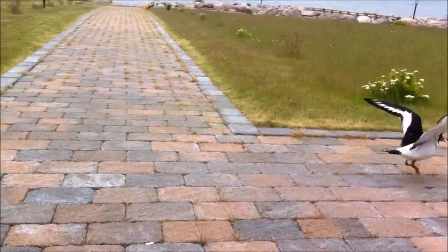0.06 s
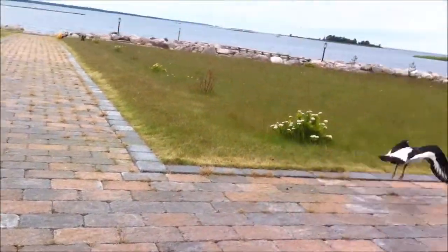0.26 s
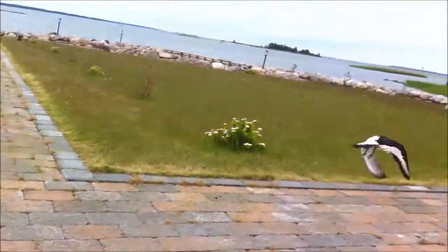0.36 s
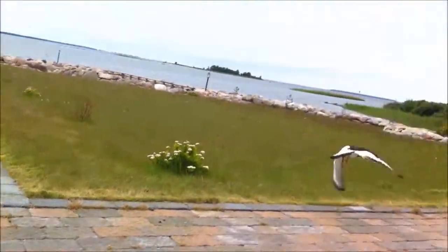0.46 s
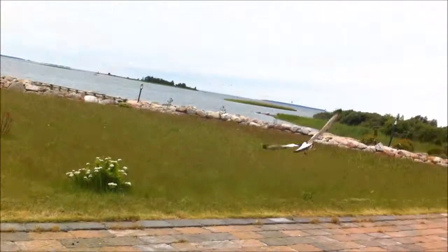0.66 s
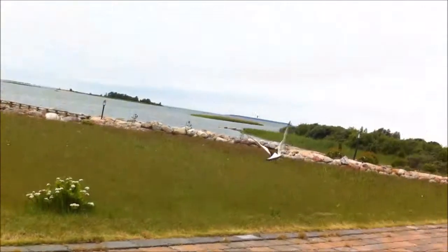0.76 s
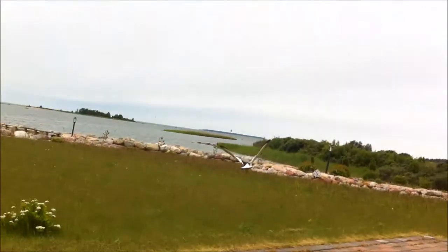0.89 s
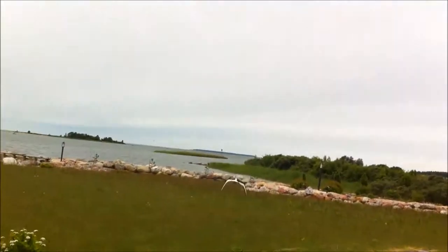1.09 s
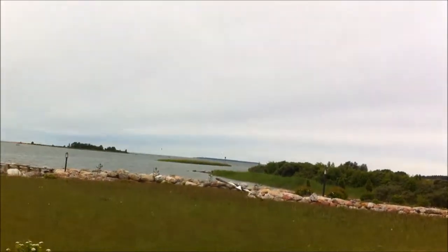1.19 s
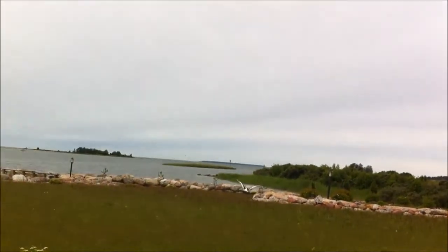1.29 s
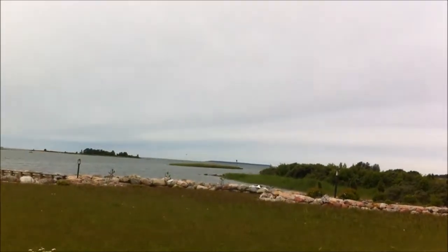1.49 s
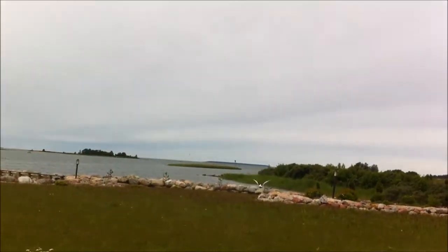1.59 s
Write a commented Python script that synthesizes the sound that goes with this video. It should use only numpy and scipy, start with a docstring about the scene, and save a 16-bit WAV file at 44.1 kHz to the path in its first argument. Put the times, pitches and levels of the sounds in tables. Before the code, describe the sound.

One piercing shorebird whistle breaks into a rasp over low puffs of wind.

```python
"""Oystercatcher on a breezy shore

Close to the microphone an oystercatcher takes off with one piercing two-step whistle that breaks
into a rasp, thrown back by paving and a wall. Light wind buffets the microphone in low puffs.
A few small ticks and soft rustles pass nearby; far off lie a faint shore wash and other waders."""
import sys
import numpy as np
from scipy import signal
from scipy.fft import rfft, irfft
from scipy.io import wavfile
from scipy.ndimage import uniform_filter1d

SR = 44100
rng = np.random.default_rng(int(sys.argv[2]) if len(sys.argv) > 2 else 0)


def digitize_waveform(pressure):
    """Quantize a signal to 16-bit integers and store it at the path in sys.argv[1].

    Rows of a 2-D input are taken as channels; values are limited to [-1, 1].
    """
    field = np.atleast_2d(pressure).T
    bounded = np.clip(field, -1, 1)
    quanta = np.round(bounded * 32767).astype(np.int16)
    wavfile.write(sys.argv[1], SR, quanta)


N = 72765

# colour of the distant wash: frequency_hz, density_db
WASH_SPECTRUM = [(30, 4.5), (200, 0.5), (500, -3.5), (900, -6.5), (1300, -7.5), (1800, 0), (2600, -8.5),
                 (4000, -12.5), (7000, -12), (10000, -10.5), (16000, -14)]
# rise and fall of the wash's treble: time_s, gain_db
WASH_TREBLE = [(0, 4.5), (.3, -6), (.8, 1), (1.2, -7.5), (1.35, -3), (1.65, -6.5)]
# far waders: start_s, length_s, start_hz, end_hz, level_db
FAR_WHISTLES = [(-.04, 0.16, 3160, 3120, -69.5), (.1, 0.14, 3165, 3153, -64.5),
                (1.29, 0.12, 2610, 2304, -64.5), (1.415, 0.029, 3170, 3130, -71),
                (1.431, 0.023, 2720, 2740, -62.5), (1.455, 0.023, 2780, 2540, -60.5)]
# soft rustles nearby: centre_s, length_s, level_db
RUSTLES = [(.2, 0.1, -64.5), (.34, 0.18, -61.5), (.92, 0.23, -58), (1.15, 0.14, -61.5)]
# colour of a rustle: frequency_hz, density_db
RUSTLE_SPECTRUM = [(100, 2), (1000, 12), (2500, 4.5), (5000, 4.5), (7000, 5), (9500, 7), (13000, 6),
                   (16000, -21)]
# small ticks: start_s, level_db, low_cut_hz
TICKS = [(0.0134, -46, 7860), (0.2059, -46.5, 7550), (0.9938, -35.5, 400), (1.0609, -40, 6640),
         (1.151, -47.5, 4660), (1.195, -38.5, 633)]
# colour of a tick: frequency_hz, density_db
TICK_SPECTRUM = [(300, 17), (1000, 5), (1800, 10.5), (2500, -1), (3700, -3), (7000, -1), (9500, 1.5),
                 (11300, 2.5), (13000, -2.5), (16000, -2.5)]
# colour of wind on the microphone: frequency_hz, density_db
WIND_SPECTRUM = [(25, -15.5), (50, -23), (80, -10.5), (120, 1), (165, 2.5), (240, -5), (330, -16.5),
                 (480, -22.5), (750, -49.5), (1500, -110), (5000, -91)]
# gusts on the microphone: centre_s, length_s, level_db
GUSTS = [(.025, 0.083, -41.5), (.105, 0.017, -46), (.17, 0.057, -47.5), (.218, 0.04, -34.5),
         (.263, 0.059, -36.5), (.385, 0.029, -45.5), (.445, 0.017, -39.5), (.51, 0.048, -44.5),
         (.675, 0.16, -54.5), (.728, 0.058, -54.5), (.85, 0.08, -50), (.922, 0.047, -40.5),
         (.996, 0.042, -36.5), (1.081, 0.026, -38), (1.15, 0.069, -54), (1.273, 0.011, -48),
         (1.355, 0.064, -39), (1.635, 0.043, -38.5)]
# sharp buffets on the microphone: start_s, peak_db
BUFFETS = [(.2045, -23), (.2235, -29), (.2705, -24), (.575, -37), (.911, -31), (.926, -30), (.9755, -31),
           (.9945, -31), (1.344, -27), (1.3745, -29), (1.5898, -28), (1.6375, -30)]
# echoes off paving and wall: delay_s, gain_db
ECHOES = [(.0075, -12.5), (.023, -12), (.031, -10), (.038, -15)]
# diffuse tail of the surroundings: frequency_hz, level_db, t60_s
TAIL_BANDS = [(700, 22.5, .6), (1500, 6.5, 1), (2110, -8, 0.48), (2750, -2.5, .4), (3200, 2, 0.34),
              (3800, -5, 0.38), (4600, -5.5, 0.4), (6700, -8, 0.46), (9500, -7, 0.24), (15000, -11, 0.4)]
# how much of the call feeds the tail: time_s, gain_db
TAIL_SEND = [(.46, 0), (.48, -3), (.5, -2), (.512, 3), (.53, .5)]
# lingering echo of the call's low opening note: time_s, pitch_hz, level_db
LINGERING_ECHO = [(.428, 2219, -42), (0.437, 2216, -31), (.449, 2190, -38), (.475, 2190, -44),
                  (.5, 2198, -40), (0.509, 2270, -52)]
# fundamental of the close call: time_s, pitch_hz, level_db
CALL_CONTOUR = [(.374, 1487, -61), (.384, 1732, -47.5), (.39, 1962, -46.5), (.4, 2175, -37),
                (0.406, 2212, -35), (.426, 2120, -36), (.435, 1954, -43.5), (0.446, 1836, -47),
                (0.451, 2131, -38), (0.458, 2398, -35), (.461, 2859, -27.5), (.47, 3115, -30.5),
                (0.478, 3199, -20.5), (0.492, 3235, -28.5), (0.504, 3315, -30.5), (0.508, 3787, -27),
                (0.516, 3759, -29), (.522, 3614, -34), (.525, 3101, -30.5), (0.536, 2827, -31.5),
                (0.542, 2286, -32.5), (0.547, 1760, -43)]
# the overtones together, and how rough the voice is: time_s, level_db, roughness
CALL_EDGE = [(0.384, -66, 0.8), (0.387, -46.5, 0.64), (0.409, -40, 0.17), (0.426, -40, 0.77),
             (.445, -50, 0.3), (0.454, -38.5, 0.6), (0.464, -35.5, 0.8), (.478, -32.5, .15),
             (0.493, -29.5, 0.1), (0.504, -23.5, 0.1), (0.514, -39.5, 1), (.524, -26.5, 1),
             (.532, -28, 1.1), (0.539, -38.5, 1), (.547, -42, 0.9)]
# strength of each overtone: pitch_multiple, gain_db
OVERTONES = [(2, -2), (3, -9.5), (4, -8), (5, -15), (6, -12)]
# throat and bill colour on the overtones: frequency_hz, gain_db
BILL_COLOUR = [(3500, -3), (4400, -2), (5400, -3.5), (6500, -11.5), (7400, 0.5), (8100, 0.5), (8800, -3.5),
               (9700, 5), (10400, -3), (11200, 2), (11900, -1), (12900, 0.5), (13900, -14), (15300, -2),
               (16300, -26)]
# overtones fraying into noise as the call breaks: time_s, noise_share
FRAYING = [(.445, .04), (.46, .1), (.48, .1), (.503, .1), (.515, .25), (.54, .3)]
# hoarse air in the call: frequency_hz, density_db
RASP_SPECTRUM = [(200, -9.5), (800, -23), (1400, -5), (2200, 16), (3200, 11.5), (4800, 8.5), (7000, 18.5),
                 (9500, 5), (13000, 10), (16000, -2)]
# dips in the call's colour: centre_hz, width_hz, gain_db
CALL_DIPS = [(4120, 190, -8), (5270, 200, -7), (8150, 400, -15), (10380, 390, -17)]

JITTER_SHARE, JITTER_HZ = 0.012, 900  # pitch flutter of the call and its lingering echo
SHIMMER_DB, SHIMMER_HZ = 3.5, 208  # their level flutter


def amp(db):
    """Decibels to gain."""
    return 10 ** (np.asarray(db) / 20)


def unit(x):
    """Scales to rms 1."""
    return x / np.sqrt(np.mean(x ** 2) + 1e-20)


def read(points, hz):
    """Reads a spectrum on a log-frequency axis."""
    f, value = np.transpose(points)
    return np.interp(np.log(hz + 1), np.log(f + 1), value)


def add(mix, start_s, sound):
    """Mixes a sound in at its start time and returns the mix."""
    at = round(start_s * SR)
    sound = sound[max(-at, 0):]
    part = mix[max(at, 0):][:len(sound)]
    part += sound[:len(part)]
    return mix


def noise(spectrum):
    """Noise of rms 1 with the given spectrum."""
    gain = amp(read(spectrum, np.fft.rfftfreq(N, 1 / SR)))
    return unit(irfft(rfft(rng.standard_normal(N)) * gain, N))


def wander(hz, samples=N):
    """Random drift of rms about 1, up to the given rate."""
    gain = np.exp(-(np.fft.rfftfreq(N, 1 / SR) / hz) ** 2)
    return unit(irfft(rfft(rng.standard_normal(N)) * gain, N))[:samples]


def swells(rows):
    """Power of bell-shaped swells."""
    t = np.arange(N) / SR
    return sum(amp(db) ** 2 * np.exp(-(2 * (t - centre) / length) ** 2) for centre, length, db in rows)


def phase_of(hz):
    """Running phase of a moving pitch, in radians."""
    return 2 * np.pi * np.cumsum(hz) / SR


def fade_ends(t, times, ramp_s=0.002):
    """Short ramps at both ends of a note."""
    return np.clip(np.minimum(t - times[0], times[-1] - t) / ramp_s, 0, 1)


def shore_wash(level_db=-60, patch_db=1.2, treble_hz=3420):
    """The shore in the distance: a faint wash with drifting patches of colour."""
    hz, t, bands = signal.stft(noise(WASH_SPECTRUM), SR, nperseg=512)
    blur = np.outer(np.hanning(9), np.hanning(15))
    patches = unit(signal.fftconvolve(rng.standard_normal(bands.shape), blur, "same"))
    treble_db = np.outer(hz ** 4 / (hz ** 4 + treble_hz ** 4), np.interp(t, *np.transpose(WASH_TREBLE)))
    wash = unit(signal.istft(bands * amp(patch_db * patches + treble_db), nperseg=512)[1][:N])
    opening_db = np.interp(np.arange(N) / SR, [0, 0.35], [-5.5, 0])
    return amp(level_db + opening_db) * wash


def diffuse_tail(sound, delay_s=0.006, rise_s=0.021):
    """Scatter from the surroundings, the treble dying first."""
    band_hz, band_db, band_t60 = np.transpose(TAIL_BANDS)
    hz, t, bands = signal.stft(rng.standard_normal(SR), SR, nperseg=256)
    gain = amp(read(np.c_[band_hz, band_db], hz))[:, None]
    decay_rate = np.log(1000) / read(np.c_[band_hz, band_t60], hz)[:, None]
    decay = np.exp(-decay_rate * t) * np.sqrt(2 * decay_rate / SR)  # same energy at any t60
    ring = signal.istft(bands * gain * decay, SR, nperseg=256)[1]
    age = np.maximum(np.arange(len(ring)) / SR - delay_s, 0)
    near_scatter = 1 + 0.63 * np.exp(-age / 0.0081)
    ring *= np.minimum(age / rise_s, 1) * near_scatter
    return signal.fftconvolve(sound, ring)[:N]


def far_waders(waver_hz=260, tail_db=-12):
    """Thin level or falling whistles, blurred by distance."""
    out = np.zeros(N)
    for start, length, start_hz, end_hz, db in FAR_WHISTLES:
        progress = np.arange(0, length, 1 / SR) / length
        glide_hz = start_hz + (end_hz - start_hz) * progress
        waver = 0.004 + 0.4 * abs(end_hz / start_hz - 1)  # gliding whistles waver more
        hz = glide_hz * (1 + waver * wander(waver_hz, len(progress)))
        arch = np.sqrt(abs(np.sin(np.pi * progress)))
        add(out, start, amp(db) * arch * np.sin(phase_of(hz)))
    return out + amp(tail_db) * diffuse_tail(out)


def rustles():
    """Soft swells of hiss nearby."""
    return noise(RUSTLE_SPECTRUM) * np.sqrt(swells(RUSTLES))


def ticks(rise_s=0.00031, decay_s=0.0018):
    """Tiny dry snaps with no ring."""
    out, t = np.zeros(N), np.arange(SR // 50) / SR
    envelope = np.minimum(t / rise_s, 1) * np.exp(-t / decay_s)
    for start, db, low_cut_hz in TICKS:
        low_cut = signal.butter(2, low_cut_hz, "high", fs=SR, output="sos")
        snap = unit(signal.sosfilt(low_cut, noise(TICK_SPECTRUM)))[:len(t)]
        add(out, start, amp(db) * snap * envelope)
    return out


def wind_rumble(breeze_db=-66, lump_db=3.5, lump_hz=25):
    """Wind on the microphone: a lumpy rumble that swells with each gust."""
    rumble = noise(WIND_SPECTRUM)
    breeze = amp(breeze_db + lump_db * wander(lump_hz))
    return rumble * np.sqrt(swells(GUSTS) + breeze ** 2)


def wind_buffets(start_hz=330, end_hz=156, sag_s=0.0032, rise_s=0.0014, decay_s=0.0042):
    """Puffs hit the microphone as short thumps that sag in pitch."""
    out, t = np.zeros(N), np.arange(SR // 20) / SR
    hz = end_hz + (start_hz - end_hz) * np.exp(-t / sag_s)
    envelope = (1 - np.exp(-(t / rise_s) ** 2)) * np.exp(-t / decay_s)
    thump = envelope * np.sin(phase_of(hz))
    for start, db in BUFFETS:
        add(out, start, amp(db) * thump / abs(thump).max())
    return out


def echoes(sound, top_hz=4500):
    """Single reflections from paving and wall, dulled by the grass."""
    out = np.zeros(N)
    for delay, db in ECHOES:
        add(out, delay, amp(db) * sound)
    return signal.sosfilt(signal.butter(1, top_hz, fs=SR, output="sos"), out)


def lingering_echo():
    """The call's low opening note rings on near 2.2 kHz as a lingering echo."""
    times, pitch, db = np.transpose(LINGERING_ECHO)
    t = np.arange(times[0], times[-1], 1 / SR)
    hz = np.interp(t, times, pitch) * (1 + JITTER_SHARE * wander(JITTER_HZ, len(t)))
    level = amp(np.interp(t, times, db) + SHIMMER_DB * wander(SHIMMER_HZ, len(t)))
    tone = np.sqrt(2) * level * np.sin(phase_of(hz))
    return add(np.zeros(N), times[0], tone * fade_ends(t, times))


def hollowed(voice):
    """Narrow dips part the call's bright bands."""
    hz = np.fft.rfftfreq(N, 1 / SR)
    dips_db = sum(db * np.exp(-(2 * (hz - centre) / width) ** 2) for centre, width, db in CALL_DIPS)
    return irfft(rfft(voice) * amp(dips_db), N)


def oystercatcher_call(flicker_db=3.5, flicker_hz=132, fray_hz=650, rasp_db=-9):
    """Close by, a whistle steps up in pitch, purest when loudest, and breaks into a rasp as it falls."""
    times, pitch, db = np.transpose(CALL_CONTOUR)
    t = np.arange(times[0], times[-1], 1 / SR)
    n = len(t)
    edge_times, edge_levels, edge_roughness = np.transpose(CALL_EDGE)
    edge_db = np.interp(t, edge_times, edge_levels)
    roughness = np.clip(np.interp(t, edge_times, edge_roughness), 0, 1)
    glide_hz = uniform_filter1d(np.interp(t, times, pitch), size=90)
    hz = glide_hz * (1 + JITTER_SHARE * roughness * wander(JITTER_HZ, n))
    phase = phase_of(hz)
    shimmer_db = SHIMMER_DB * roughness * wander(SHIMMER_HZ, n)
    voice = amp(np.interp(t, times, db) + shimmer_db) * np.sin(phase)
    noise_share = np.interp(t, *np.transpose(FRAYING))
    for multiple, gain_db in OVERTONES:
        level_db = edge_db + gain_db + read(BILL_COLOUR, multiple * hz)
        level_db += flicker_db * wander(flicker_hz, n)  # each overtone fades on its own
        fuzz = (wander(fray_hz, n) + 1j * wander(fray_hz, n)) / np.sqrt(2)
        fraying = np.sqrt(1 - noise_share) + np.sqrt(noise_share) * fuzz
        overtone = (fraying * np.exp(1j * multiple * phase)).imag
        voice += amp(level_db) * (multiple * hz < SR / 2) * overtone
    voice += amp(edge_db + rasp_db) * roughness * noise(RASP_SPECTRUM)[:n]
    return add(np.zeros(N), times[0], np.sqrt(2) * voice * fade_ends(t, times))


def scene():
    """At one microphone: the close bird and its echoes over wind and shore."""
    bird = hollowed(oystercatcher_call() + lingering_echo())
    send = amp(np.interp(np.arange(N) / SR, *np.transpose(TAIL_SEND)))  # the call's end rings on most
    reflections = echoes(bird) + diffuse_tail(bird * send)
    wind = wind_rumble() + wind_buffets()
    background = shore_wash() + rustles() + ticks() + far_waders()
    return (background + wind + reflections + bird)[None]


def record(dry, low_cut_hz=65, top_hz=16200):
    """The microphone's low cut and the recorder's band limit."""
    thinned = signal.sosfilt(signal.butter(2, low_cut_hz, "high", fs=SR, output="sos"), dry)
    band_limit = signal.firwin(511, top_hz, window=("kaiser", 9), fs=SR)
    return signal.oaconvolve(thinned, band_limit[None], "same")


dry = scene()
out = record(dry)
digitize_waveform(out)
```